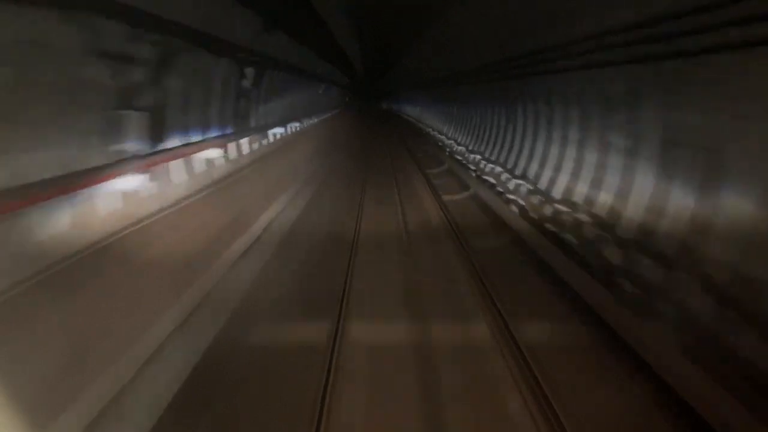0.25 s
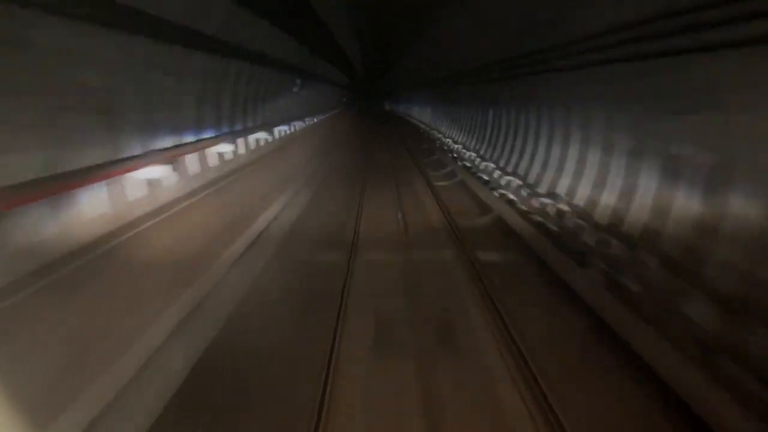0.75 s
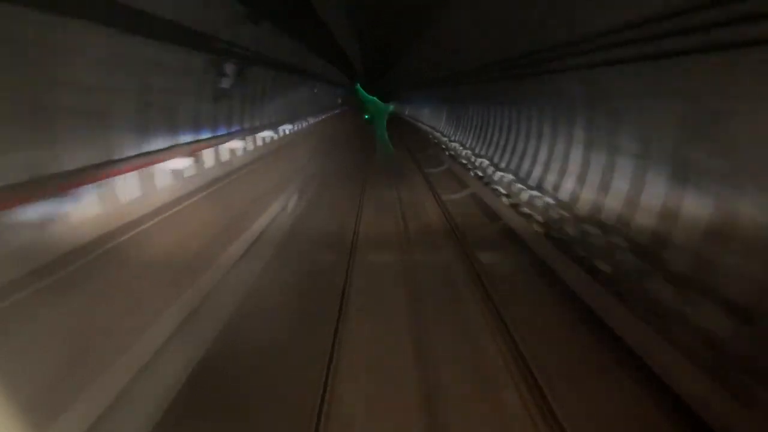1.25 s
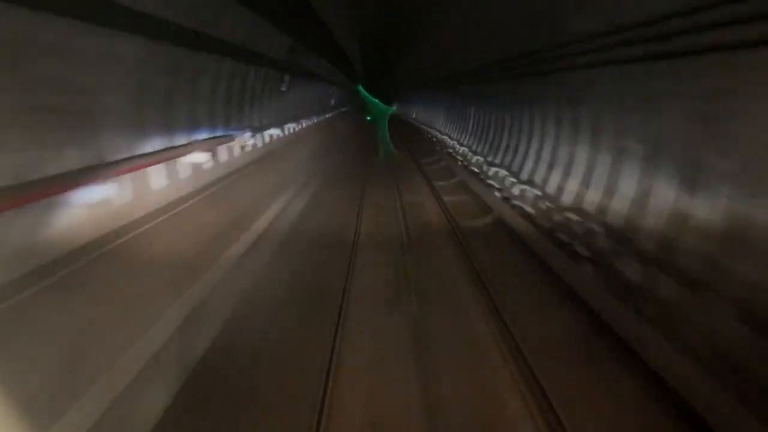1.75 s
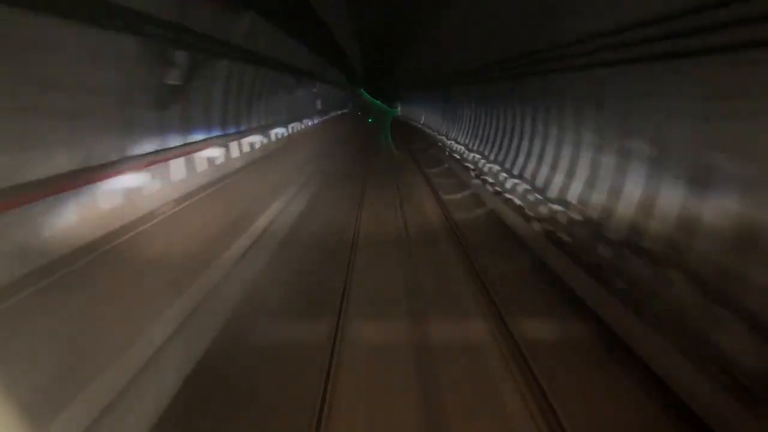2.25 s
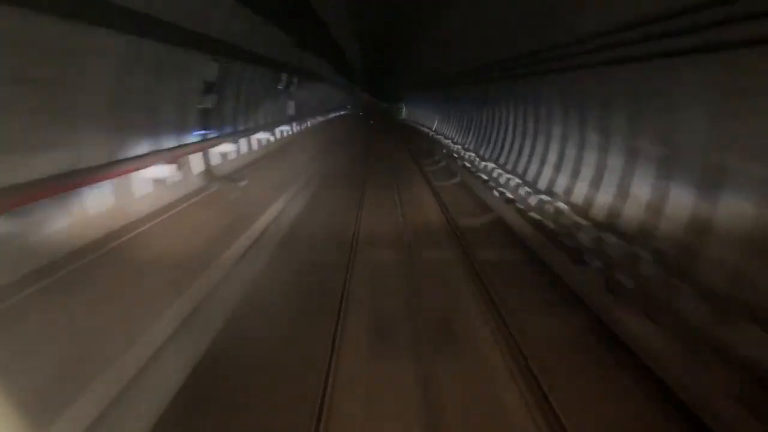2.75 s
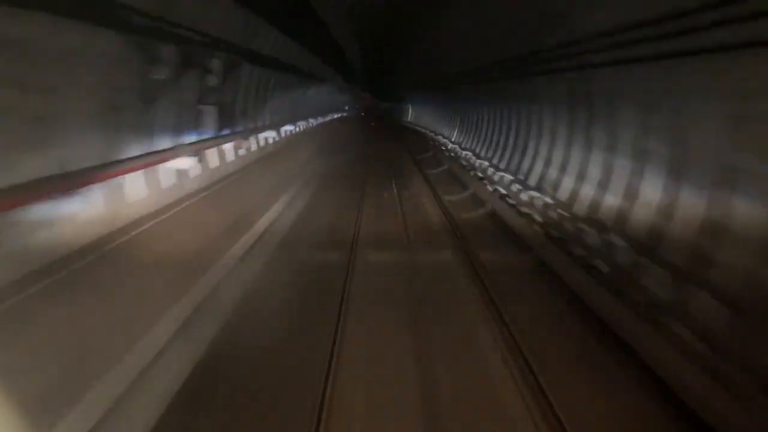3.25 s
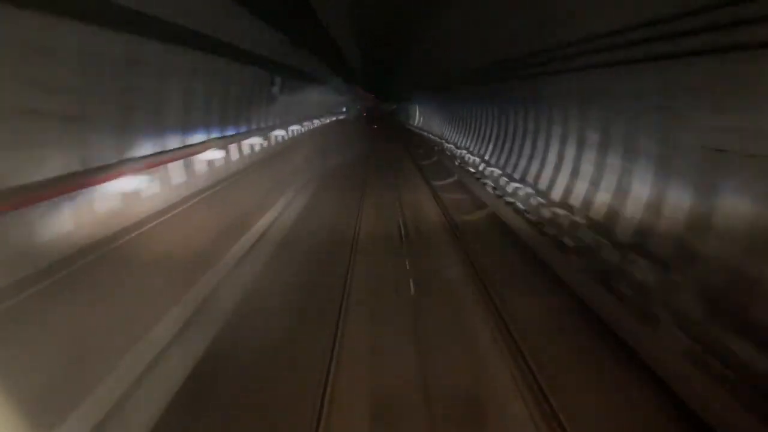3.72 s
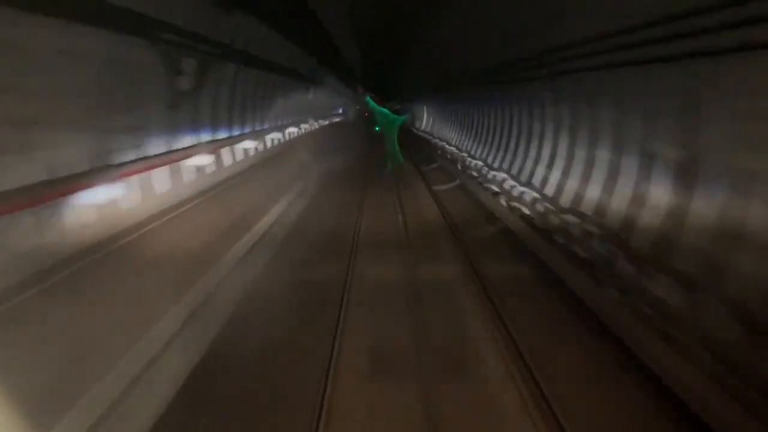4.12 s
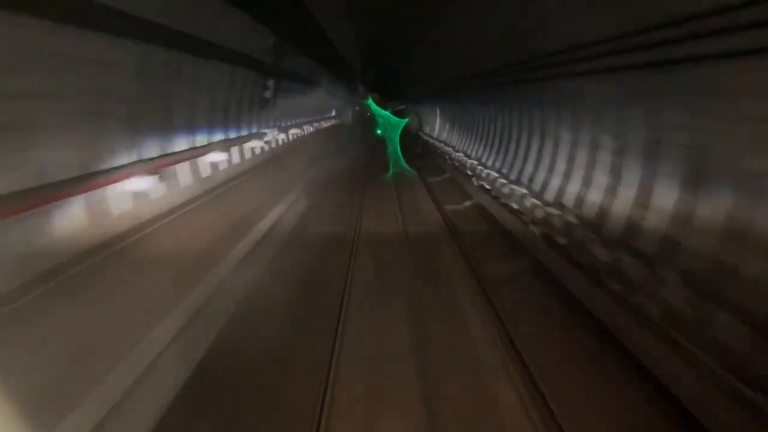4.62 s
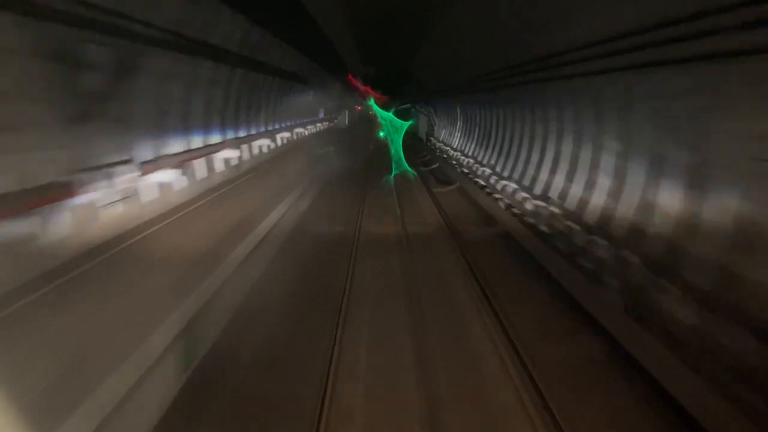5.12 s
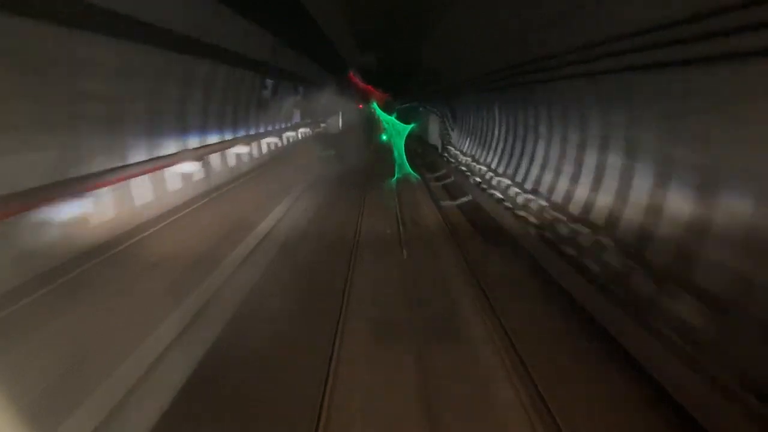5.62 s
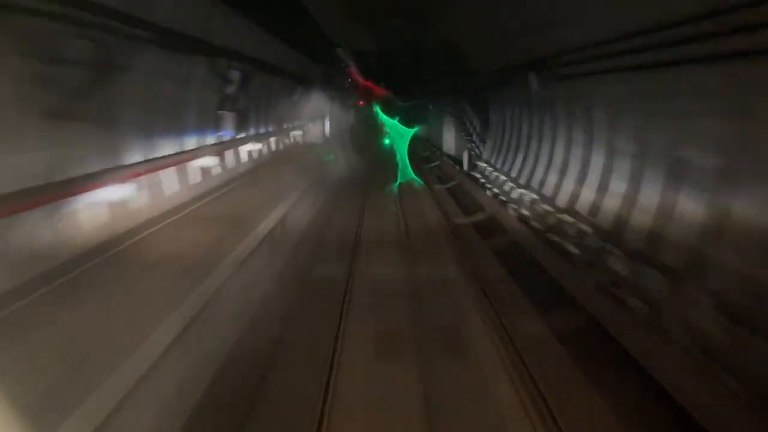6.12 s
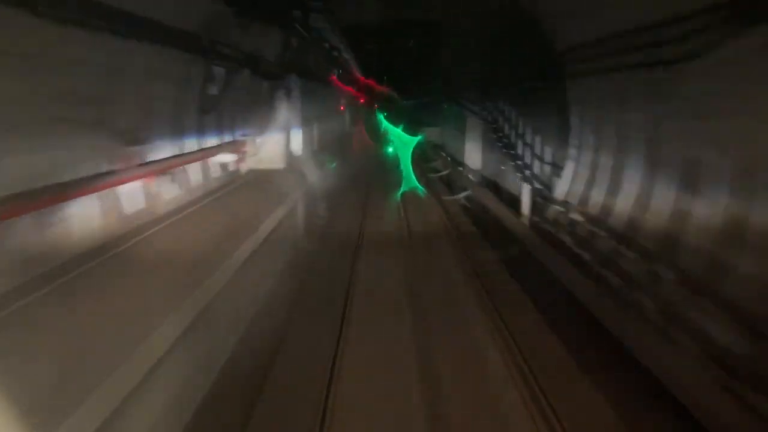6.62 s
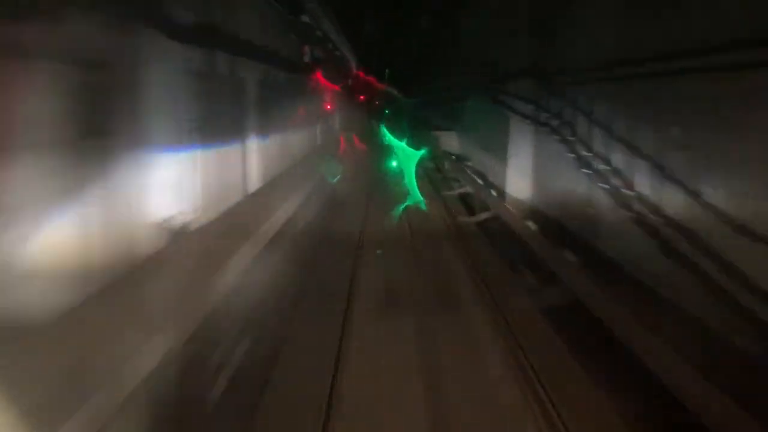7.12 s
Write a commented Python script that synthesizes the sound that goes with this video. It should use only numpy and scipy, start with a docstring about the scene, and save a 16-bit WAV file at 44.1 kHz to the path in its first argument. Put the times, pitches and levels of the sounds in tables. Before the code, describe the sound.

A metro train runs at speed through a tunnel for about seven seconds, heard close up in stereo from inside the cab. A deep rumble, floor drone and hollow rail roar hold steady throughout. Above them a high, noisy motor whine flickers in strength and rises very slightly in pitch, with a faint fan hum and soft air hiss behind it. Panels drum and the tunnel howls in small swells. The car body gives uneven low throbs, often in pairs, strongest around 2.5, 3.6 to 4 and 6 to 7.3 seconds. Dull wheel knocks come through the floor at irregular moments, clearest near 0.5, 1.5 and 4.5 seconds. From about 4 seconds one wheel adds a faint, rough, high ringing that holds until nearly 6 seconds and fades by 6.5. The rumble continues to the end without slowing.

```python
"""Rumble and rail roar fill the cab of a metro train at speed in a tunnel, heard at two close mic ports.
Rough wheels and rails excite the cab's resonances; the traction drive whines in a noise band near 2 kHz,
a fan hums, air hisses past the front. Panels drum, the tunnel howls, the car body booms in throbs and
wheels knock through the floor. Later one wheel sings, then fades.
Each source is a pair of signals: common to both ports, and in antiphase."""
import sys
import numpy as np
from scipy import signal
from scipy.fft import rfft, irfft, next_fast_len
from scipy.io import wavfile
from scipy.ndimage import uniform_filter1d, minimum_filter1d, map_coordinates

SR = 44100
rng = np.random.default_rng(int(sys.argv[2]) if len(sys.argv) > 2 else 0)


def output_pcm(signal):
    """Save a mono or channel-first signal as 16-bit PCM at the path in sys.argv[1].

    Samples are clipped to [-1, 1] before scaling.
    """
    pcm = np.clip(np.atleast_2d(signal).T, -1, 1) * 32767
    wavfile.write(sys.argv[1], SR, np.round(pcm).astype(np.int16))


N = 325017

# rolling noise (time [s], rumble [dB], floor drone [dB], rail roar [dB])
ROLLING_LEVELS = [(0, -20.5, -27, -26.5), (.5, -19.5, -27.5, -26.5), (.95, -17, -26, -26),
                  (1.3, -21, -24.5, -26.5), (1.9, -18, -26.5, -26.5), (2.4, -21.5, -25, -26.5),
                  (2.8, -19, -28, -27), (3.7, -19.5, -25.5, -25.5), (4.1, -18.5, -26.5, -26.5),
                  (4.6, -18.5, -24, -25.5), (5.0, -21, -27.5, -27), (5.4, -17.5, -25, -25.5),
                  (5.8, -22, -25.5, -26), (6.2, -20, -25.5, -25), (6.45, -19.5, -26.5, -25.5),
                  (6.7, -18.5, -21.5, -27.5), (7.0, -19.5, -26, -26.5), (7.37, -18, -23.5, -27)]
# noise spectra, common and antiphase (frequency [Hz], relative density [dB])
RUMBLE_COMMON = [(13, -48.5), (28, -8), (42, -8), (60, -0.5), (78, 1.5), (150, -7), (205, -9.5),
                 (257, -17.5), (330, -40.5), (600, -120)]
RUMBLE_ANTIPHASE = [(13, -36), (28, -20), (60, -1), (100, -6), (170, -7), (235, -9), (300, -11.5),
                    (390, -33), (660, -120)]
DRONE_COMMON = [(140, -38), (235, 2), (263, -0.5), (323, 0), (437, 2.5), (528, -4), (580, -12.5),
                (750, -35), (1280, -120)]
DRONE_ANTIPHASE = [(140, -37), (235, -5.5), (274, -3.5), (329, -9), (387, -1.5), (580, -7), (750, -33.5),
                   (1280, -120)]
ROAR_COMMON = [(340, -33.5), (580, -1.5), (868, 0), (977, -5.5), (1110, -13.5), (1220, -14.5),
               (1340, -18.5), (1630, -21), (1800, -16), (2340, -50), (3960, -120)]
ROAR_ANTIPHASE = [(340, -28.5), (580, -3), (605, -4), (763, -4), (1070, -12), (1210, -7.5), (1800, -23.5),
                  (2340, -48), (3960, -120)]
HISS_COMMON = [(1900, -55), (2400, -3.5), (2750, -3), (3000, -8), (3180, -8.5), (3500, -18.5), (3850, -13),
               (4400, -13.5), (4800, -20.5), (5300, -17.5), (6200, -22.5), (6700, -29), (7400, -33.5),
               (7800, -86)]
HISS_ANTIPHASE = [(1900, -58), (2400, 1), (2600, -4.5), (3050, -1.5), (3190, -8), (3450, -5.5), (3900, -10),
                  (4700, -15), (5300, -10.5), (5800, -16.5), (6500, -20.5), (9300, -24), (9750, -26),
                  (10300, -90)]
DRIVE_BAND_COMMON = [(970, -45.5), (1650, -22.5), (1750, -21.5), (1870, -8), (2040, -0.5), (2140, -2.5),
                     (2450, -17.5), (3180, -53), (5390, -120)]
DRIVE_BAND_ANTIPHASE = [(970, -31), (1650, -4), (1740, -12), (1890, 1), (2020, 1.5), (2120, 1), (2450, -37),
                        (3180, -52.5), (5390, -120)]
FIZZ_COMMON = [(8900, -60), (9300, -9), (9750, 0), (10200, -5), (11800, -6), (12400, -12), (13500, -12.5),
               (13900, -87.5)]
FIZZ_ANTIPHASE = [(12000, -58.5), (12600, -14.5), (13500, -2.5), (14500, 1), (15300, -3.5), (15600, -3),
                  (15900, -87.5)]
# cab resonances (centre [Hz], width [Hz], common lift [dB], antiphase lift [dB])
CAB_MODES = [(125, 14, 2.5, 1), (189, 12, 3.5, 3), (215, 18, 4.5, 7), (250, 10, 2, 3), (310, 20, 4, 0),
             (355, 35, 3.5, 3), (386, 14, -3, 0), (411, 12, -3.5, 5), (430, 22, 2.5, 0), (455, 25, 0, 3),
             (468, 18, 2, 0), (500, 20, 1.5, 6), (715, 25, 3, 0), (750, 20, 3, 1), (775, 14, 2.5, 1),
             (848, 16, 2.5, 1), (890, 14, 2, 1), (953, 24, 6, 1), (1018, 16, 2.5, 0), (1925, 50, 3, 3),
             (2200, 40, 3.5, 1), (2820, 50, 3, 0), (3170, 80, 4, 3), (4140, 60, 2.5, 0)]
# whine pitch, following motor speed (time [s], frequency [Hz])
WHINE_PITCH = [(0, 2058), (1.7, 2066), (3.4, 2071), (3.9, 2057), (4.9, 2056), (5.8, 2067), (6.8, 2078),
               (7.37, 2084)]
# whine and the noise band round it (time [s], level [dB])
WHINE_LEVEL = [(0, -29.5), (.2, -33), (.3, -39), (.75, -38), (.85, -34.5), (1.0, -37.5), (1.15, -46),
               (1.25, -35), (1.5, -41), (1.57, -28.5), (1.8, -31), (1.95, -35), (2.05, -39.5), (2.2, -39),
               (2.45, -30), (2.6, -40), (2.9, -30.5), (3.05, -41), (3.2, -31), (3.5, -29), (3.58, -37),
               (3.83, -39), (3.9, -33), (4.15, -35.5), (4.3, -32), (4.41, -46), (4.5, -38), (4.65, -37),
               (4.95, -29), (5.03, -40), (5.4, -33), (5.6, -37), (5.75, -32), (6.0, -35.5), (6.2, -34),
               (6.4, -40), (6.55, -32.5), (6.8, -26), (6.9, -36), (7.37, -36)]
DRIVE_BAND_LEVEL = [(0, -31.5), (.6, -30), (1, -31), (1.5, -30.5), (2.1, -30.5), (2.7, -29.5), (3.3, -30.5),
                    (3.9, -32.5), (4.8, -31), (5.5, -31), (6.3, -30), (6.75, -29.5), (7.37, -30.5)]
# fan and converter tones (frequency [Hz], common [dB], antiphase [dB])
HUM_TONES = [(282.4, -43, -35.5), (400, -40.5, -48), (564.8, -54, -40.5)]
# swelling resonances (time [s], floor panel [dB], wall panel [dB], tunnel howl [dB])
RESONANCE_LEVELS = [(0, -41.5, -39, -39.5), (.5, -30, -28.5, -30.5), (.63, -33, -36, -48),
                    (.8, -31, -33, -37), (1.0, -30.5, -40.5, -39), (1.25, -40, -44, -38),
                    (1.52, -31, -35.5, -30), (1.75, -30.5, -44, -38), (1.9, -30, -35, -28.5),
                    (2.3, -36, -37, -41.5), (2.9, -36.5, -32, -35.5), (3.25, -33.5, -38, -37),
                    (3.6, -33, -36.5, -35.5), (3.9, -31, -28.5, -32), (4.2, -35, -40, -33),
                    (4.5, -27, -31.5, -38), (4.95, -36, -31.5, -36.5), (5.15, -26.5, -26, -42.5),
                    (5.45, -27, -33.5, -38.5), (5.68, -30, -22.5, -40), (5.85, -37.5, -31.5, -43),
                    (6.2, -30.5, -33, -36), (6.5, -29, -25, -51), (6.75, -29.5, -37, -40),
                    (6.9, -29, -28, -43.5), (7.05, -36, -37, -42), (7.37, -31.5, -26, -47)]
# body throbs, often paired as two axles meet one rough spot (time [s], peak [dB])
BODY_THROBS = [(.15, -15.5), (.31, -22), (.5, -19), (.62, -21), (.75, -17.5), (.85, -17.5), (1.0, -17.5),
               (1.41, -18), (1.61, -16.5), (1.84, -15.5), (1.98, -16), (2.465, -15.5), (2.515, -11),
               (2.63, -11.5), (2.74, -21), (2.845, -15.5), (2.895, -16.5), (2.98, -15.5), (3.06, -17),
               (3.47, -18.5), (3.58, -11.5), (3.69, -13), (3.92, -12.5), (4.05, -15.5), (4.201, -15),
               (4.42, -20), (4.62, -22), (4.76, -16), (4.85, -14), (4.93, -15.5), (5.22, -16.5), (5.4, -21),
               (5.53, -21), (5.72, -20.5), (5.86, -20), (6.02, -14), (6.18, -11.5), (6.235, -16.5),
               (6.3, -15.5), (6.415, -13), (6.47, -15), (6.535, -13.5), (6.58, -13), (6.74, -18),
               (6.88, -16.5), (7.1, -13), (7.15, -17.5), (7.225, -13), (7.265, -13.5)]
# wheel knocks (time [s], peak [dB], frequency [Hz])
WHEEL_KNOCKS = [(.51, -18, 191.5), (.74, -27.5, 197), (.82, -22.5, 203.4), (.98, -21, 203), (1.1, -23, 192),
                (1.54, -18, 201.4), (1.9, -24, 204), (2.58, -23, 206), (3.74, -21, 198), (4.18, -21.5, 189),
                (4.49, -18.5, 208), (4.62, -23.5, 196), (5.1, -26, 211), (5.59, -21, 198),
                (5.66, -24.5, 211), (5.69, -23, 430), (6.181, -23.5, 205), (6.419, -23, 201),
                (6.49, -22, 469), (6.78, -22, 211), (6.9, -25, 421), (6.92, -25, 199)]
# port imbalance (frequency [Hz], left over right [dB])
PORT_BALANCE = [(60, -0.5), (160, 0.5), (220, 0), (350, -1.5), (900, 1.5), (1300, 0), (1850, 5.5),
                (2200, -2), (2700, 0), (3500, 8), (4300, 2), (5200, 5), (7000, -1), (7500, 1)]


def amp(db):
    """dB to gain."""
    return 10 ** (np.asarray(db) / 20)


def unit(x):
    """Scale to rms 1."""
    return x / np.sqrt(np.mean(x ** 2) + 1e-20)


def along(points, hz):
    """Interpolate (frequency [Hz], value) on a log axis."""
    knots_hz, values = np.transpose(points)
    return np.interp(np.log(hz + 1), np.log(knots_hz + 1), values)


def curves(rows):
    """One per-sample curve for each column after time."""
    times_s, *columns = np.transpose(rows)
    return [np.interp(np.arange(N) / SR, times_s, column) for column in columns]


def wobble(rate_hz):
    """Smooth random curve, rate_hz knots a second."""
    knots = rng.standard_normal(int(N * rate_hz / SR) + 4)
    return map_coordinates(knots, [np.arange(N) * rate_hz / SR])


def bump(peak_s, rise_s, fall_s):
    """Asymmetric Gaussian envelope, peak 1."""
    t = np.arange(N) / SR - peak_s
    return np.exp(-.5 * (t / np.where(t < 0, rise_s, fall_s)) ** 2)


def filtered(x, response, mirror="odd"):
    """Apply response(hz); mirrored ends prevent clicks."""
    edge = 4096
    x = np.pad(x, ((0, 0), (edge, edge)), "reflect", reflect_type=mirror)
    size = next_fast_len(x.shape[1])
    return irfft(rfft(x, size) * response(np.fft.rfftfreq(size, 1 / SR)), size)[:, edge:edge + N]


def tone(hz, waver_hz, rate_hz):
    """Sine, rms 1, with random pitch waver."""
    turns = np.cumsum(hz + waver_hz * wobble(rate_hz)) / SR + rng.random()
    return np.sqrt(2) * np.sin(2 * np.pi * turns)


def resonance(hz, width_hz):
    """Narrowband noise, rms 1; the centre may glide."""
    phase = 2 * np.pi * np.cumsum(hz + np.zeros(N)) / SR
    return unit(wobble(width_hz) * np.cos(phase) + wobble(width_hz) * np.sin(phase))


def cab_lift_db(hz):
    """Summed cab resonances, common and antiphase."""
    return sum(np.outer(lift_db, 1 / (1 + (2 * (hz - centre_hz) / width_hz) ** 2))
               for centre_hz, width_hz, *lift_db in CAB_MODES)


def cab_noise(common, anti, anti_db, patchy_db):
    """Patchy noise coloured by the cab: common at rms 1, antiphase at anti_db."""
    spectra = signal.stft(rng.standard_normal((2, N)), nperseg=1024)[2]
    patches = uniform_filter1d(rng.standard_normal(spectra.shape[1:]), size=8, axis=0)
    patches = unit(uniform_filter1d(patches, size=10, axis=1))
    pair = signal.istft(spectra * amp(patchy_db * patches), nperseg=1024)[1][:, :N]
    pair = filtered(pair, lambda hz: amp([along(common, hz), along(anti, hz)] + cab_lift_db(hz)), "even")
    return np.array([unit(pair[0]), amp(anti_db) * unit(pair[1])])


def rolling():
    """Wheel and rail roughness: low rumble, floor drone, rail roar."""
    rumble_db, drone_db, roar_db = curves(ROLLING_LEVELS)
    rumble = amp(rumble_db) * cab_noise(RUMBLE_COMMON, RUMBLE_ANTIPHASE, anti_db=-14.5, patchy_db=0.95)
    drone = amp(drone_db) * cab_noise(DRONE_COMMON, DRONE_ANTIPHASE, anti_db=-4.5, patchy_db=0.5)
    roar = amp(roar_db) * cab_noise(ROAR_COMMON, ROAR_ANTIPHASE, anti_db=-1.5, patchy_db=1.0)
    return rumble + drone + roar


def traction_drive(gear_ratio=0.574):
    """Two unsteady tones tied to motor speed, the higher inside a noise band."""
    (hz,), (whine_db,), (band_db,) = curves(WHINE_PITCH), curves(WHINE_LEVEL), curves(DRIVE_BAND_LEVEL)
    whine_gain = amp(whine_db + 1.4 * wobble(16)) * amp([[0], [-13]])
    whine = unit(tone(hz, waver_hz=5.5, rate_hz=25) + .4 * resonance(hz + 6, width_hz=50))
    gear_gain = amp(-53.5 + 2.3 * wobble(2.6)) * amp([[-3], [0]])
    gear = tone(gear_ratio * hz, waver_hz=3, rate_hz=11)
    band_gain = amp(band_db + 0.19 * wobble(4.2))
    band = cab_noise(DRIVE_BAND_COMMON, DRIVE_BAND_ANTIPHASE, anti_db=-6.5, patchy_db=0.7)
    return whine_gain * whine + gear_gain * gear + band_gain * band


def hums():
    """Fan and converter: near-steady pitch, wandering level."""
    return sum(amp(np.c_[pair_db] + 3.6 * wobble(5.1)) * tone(hz, waver_hz=.5, rate_hz=3)
               for hz, *pair_db in HUM_TONES)


def air_hiss():
    """Air streaming past the cab front."""
    level_db = -44 + 0.34 * wobble(2.7)
    return amp(level_db) * cab_noise(HISS_COMMON, HISS_ANTIPHASE, anti_db=-6.5, patchy_db=0.6)


def fizz():
    """Very faint flickering treble."""
    return amp(-75) * cab_noise(FIZZ_COMMON, FIZZ_ANTIPHASE, anti_db=-5.5, patchy_db=3.0)


def panels_and_tunnel():
    """Floor and wall panels drum on rough track; the tunnel howls hollow."""
    floor_db, wall_db, howl_db = curves(RESONANCE_LEVELS)
    floor = amp(floor_db) * resonance(hz=204.9, width_hz=60) * amp([[0], [-12]])
    wall_hz = 444 + 16 * wobble(6)
    wall = np.array([amp(wall_db + db) * resonance(wall_hz, width_hz=70) for db in (0, -7)])
    howl = np.array([amp(howl_db + db) * resonance(hz=886, width_hz=130) for db in (0, -7)])
    return floor + wall + howl


def body_boom(mode_hz=59.7, drift_hz=1.5, waver_hz=3, rest_db=-29, scatter_turns=0.12):
    """Lowest car body mode, kicked unevenly by the track; each throb shifts its phase a little."""
    kicks = np.exp(2j * np.pi * scatter_turns * rng.standard_normal((len(BODY_THROBS), 1)))
    throbs = sum(amp(db) * kick * bump(peak_s, rise_s=.022, fall_s=.027)
                 for (peak_s, db), kick in zip(BODY_THROBS, kicks))
    rest = amp(rest_db + 4.1 * wobble(11))
    turns = np.cumsum(mode_hz + drift_hz * wobble(5) + waver_hz * wobble(18)) / SR
    swing = np.sqrt(2) * ((throbs + rest) * np.exp(2j * np.pi * turns)).real
    return swing * amp(0.99 * wobble(22)) * amp([[0], [-21]])


def wheel_knocks():
    """Each dull knock rings the floor briefly."""
    t = np.arange(N) / SR
    rings = np.zeros(N)
    for peak_s, db, hz in WHEEL_KNOCKS:
        turns = hz * (t - peak_s) + rng.random()
        rings += amp(db) * bump(peak_s, rise_s=.012, fall_s=.022) * np.sin(2 * np.pi * turns)
    return np.sqrt(2) * rings * amp([[0], [-9]])


def wheel_singing(start_s=4.05, rise_s=0.72, hold_s=1.0, fall_s=0.65, mode_hz=2726, sag_hz_per_s=31):
    """One wheel mode rings roughly: swells, holds, fades, sagging in pitch."""
    t = np.arange(N) / SR - start_s
    envelope = np.interp(t, np.cumsum([0, rise_s, hold_s, fall_s]), [0, 1, 1, 0])
    ring = resonance(mode_hz - sag_hz_per_s * t, width_hz=170)
    return envelope * amp(-46 + 1.2 * wobble(4.9)) * ring * [[1], [0]]


def scene():
    """Sum at the left port, difference at the right, then the port imbalance."""
    common, anti = (body_boom() + wheel_knocks() + rolling() + air_hiss() + panels_and_tunnel()
                    + traction_drive() + wheel_singing() + hums() + fizz())
    ports = np.array([common + anti, common - anti])
    return filtered(ports, lambda hz: amp(np.outer([.5, -.5], along(PORT_BALANCE, hz))))


def record(dry, low_cut_hz=39.6, ceiling=.87, look_ahead_s=.012, top_hz=15720):
    """Mic bass roll-off, look-ahead peak limiter, band limit."""
    x = filtered(dry, lambda hz: 1 / np.sqrt(1 + (low_cut_hz / (hz + 1)) ** 6))
    span = int(look_ahead_s * SR)
    safe_gain = ceiling / np.maximum(abs(x).max(axis=0), ceiling)
    held_gain = minimum_filter1d(safe_gain, size=2 * span + 1)
    gain = uniform_filter1d(uniform_filter1d(held_gain, size=span), size=span)
    return filtered(x * gain, lambda hz: hz < top_hz)


dry = scene()
out = record(dry)
output_pcm(out)
```